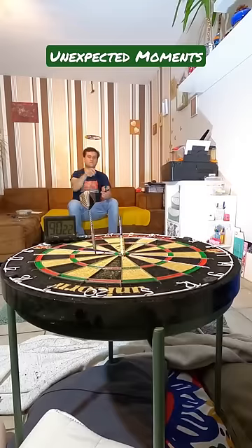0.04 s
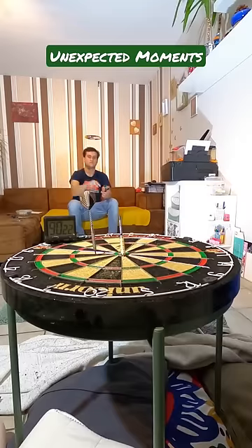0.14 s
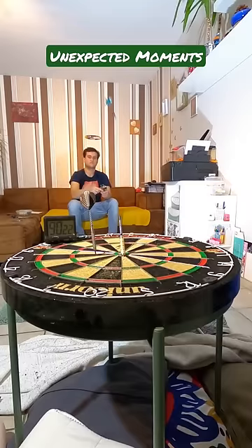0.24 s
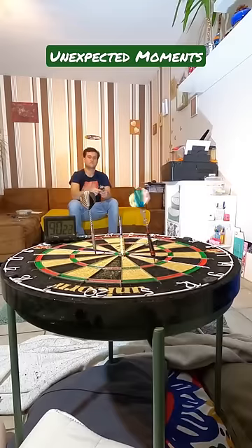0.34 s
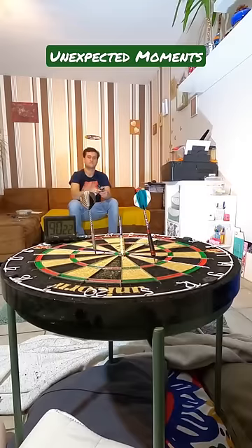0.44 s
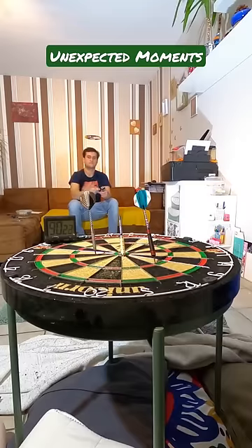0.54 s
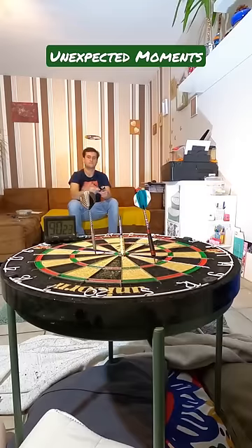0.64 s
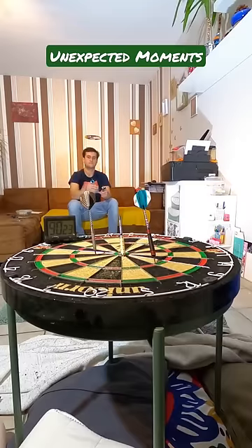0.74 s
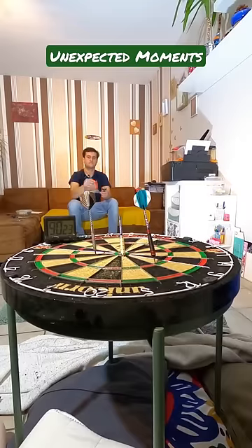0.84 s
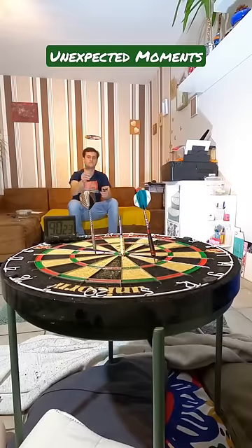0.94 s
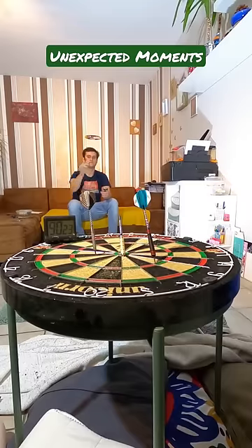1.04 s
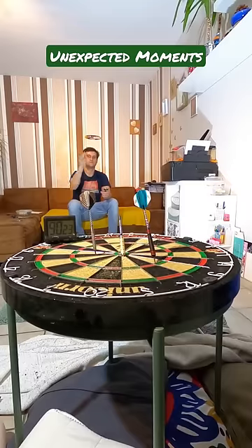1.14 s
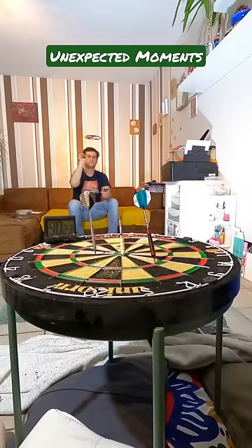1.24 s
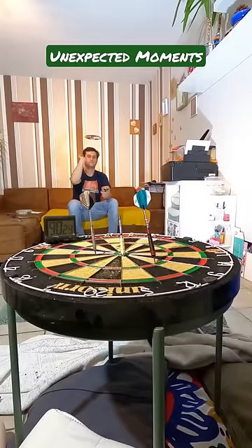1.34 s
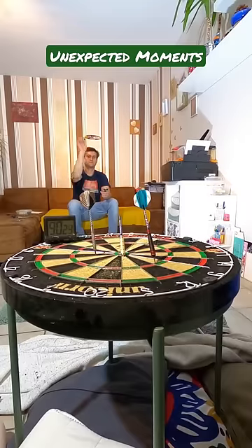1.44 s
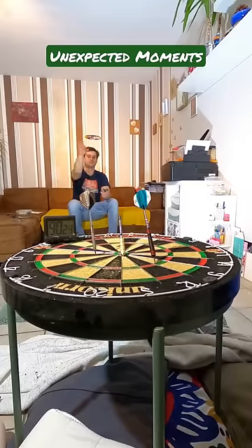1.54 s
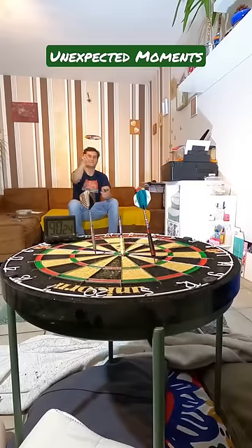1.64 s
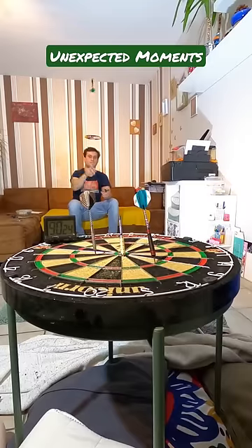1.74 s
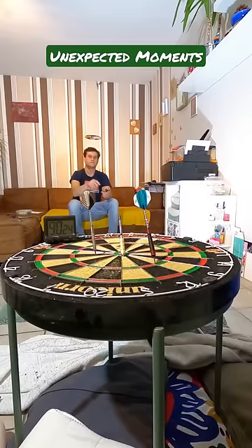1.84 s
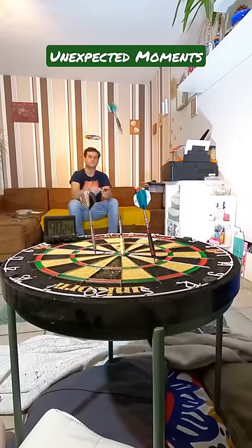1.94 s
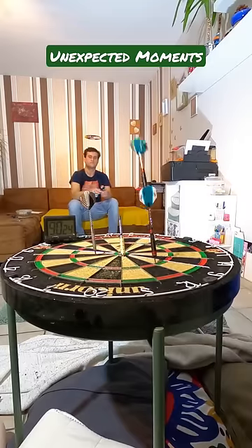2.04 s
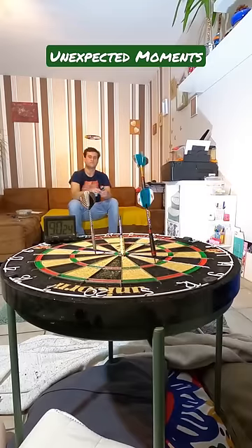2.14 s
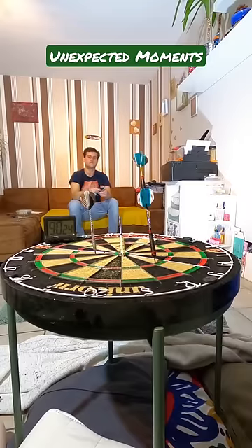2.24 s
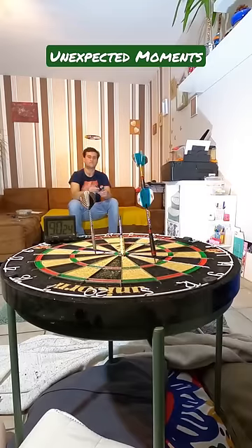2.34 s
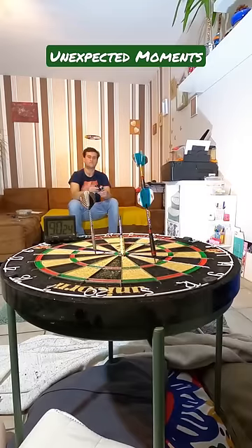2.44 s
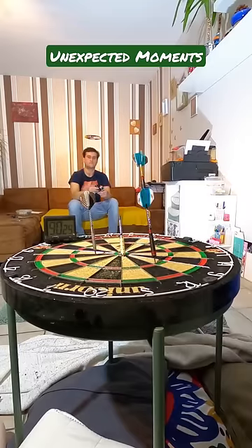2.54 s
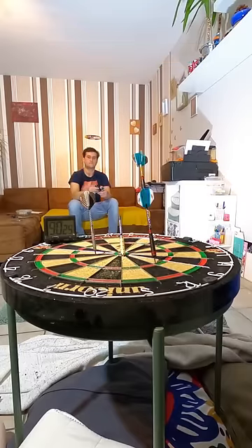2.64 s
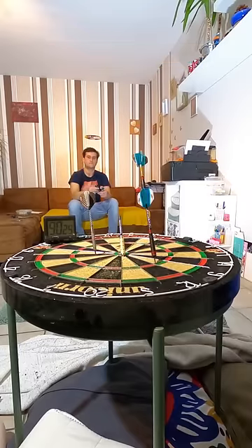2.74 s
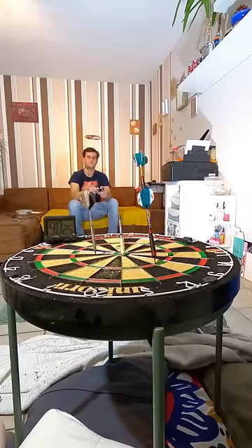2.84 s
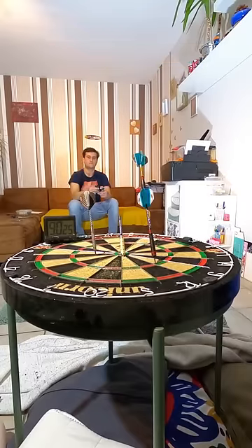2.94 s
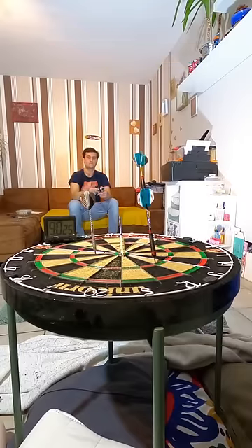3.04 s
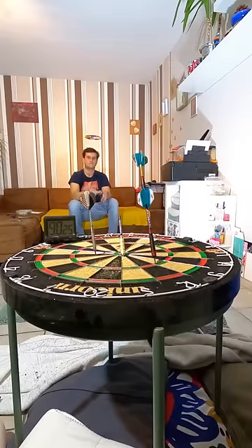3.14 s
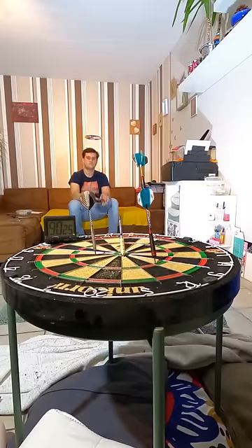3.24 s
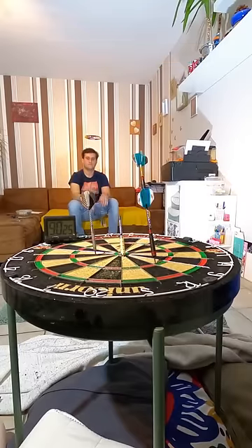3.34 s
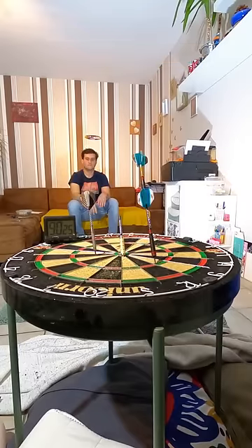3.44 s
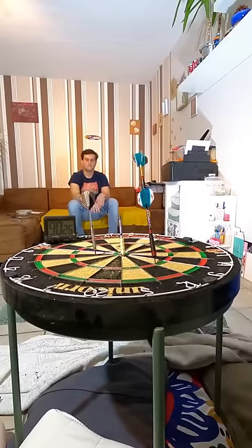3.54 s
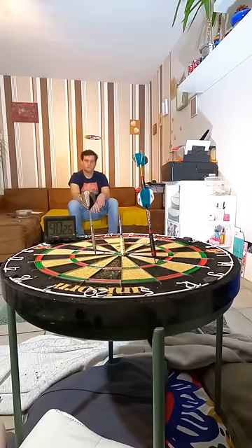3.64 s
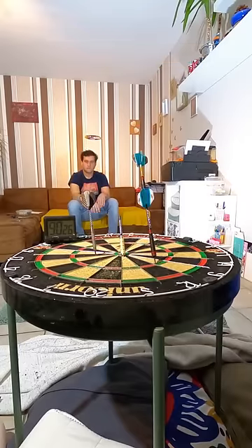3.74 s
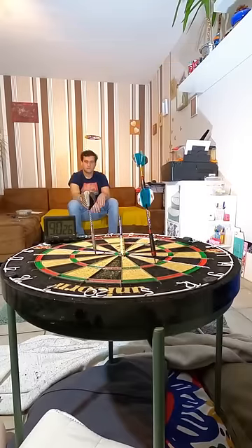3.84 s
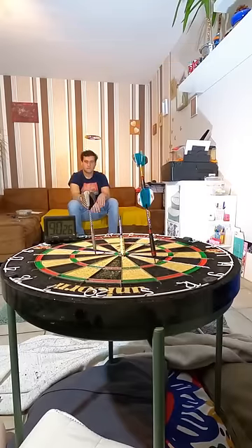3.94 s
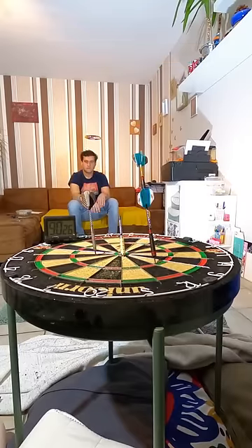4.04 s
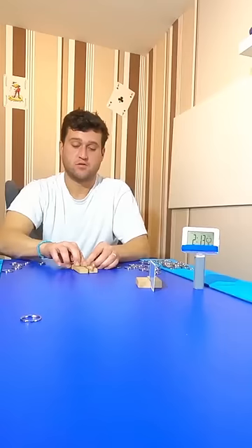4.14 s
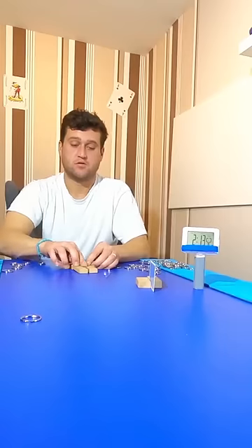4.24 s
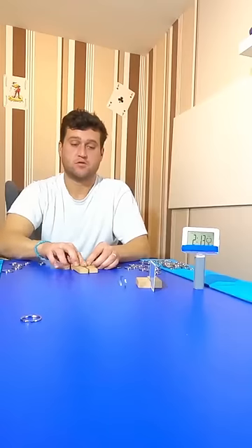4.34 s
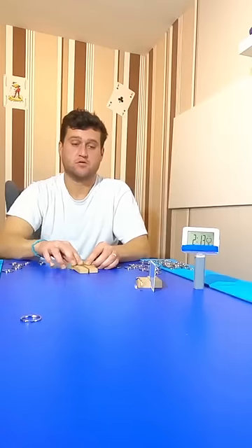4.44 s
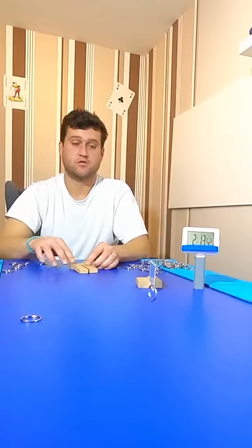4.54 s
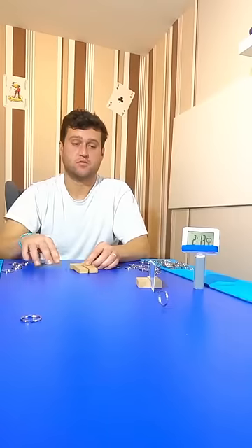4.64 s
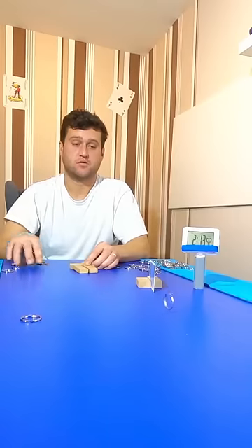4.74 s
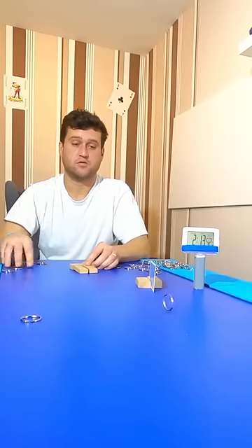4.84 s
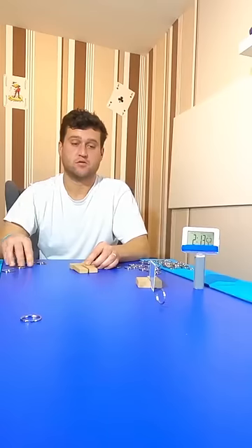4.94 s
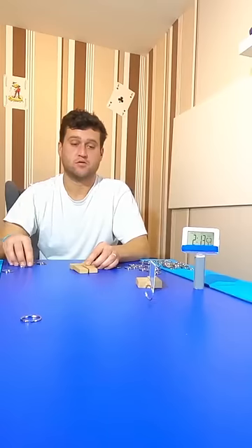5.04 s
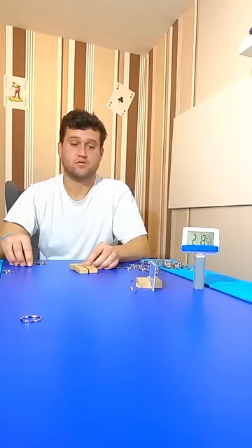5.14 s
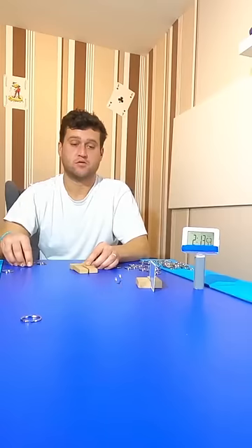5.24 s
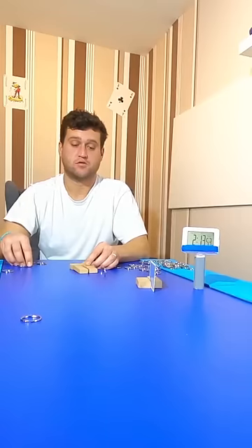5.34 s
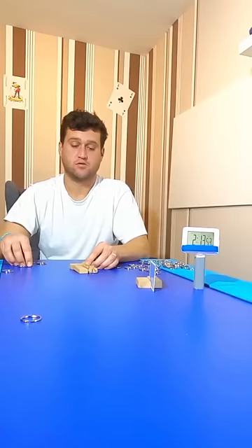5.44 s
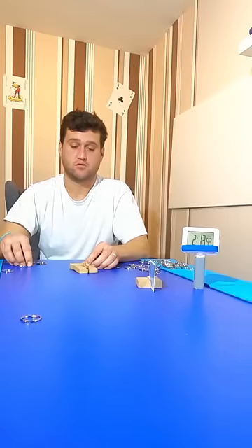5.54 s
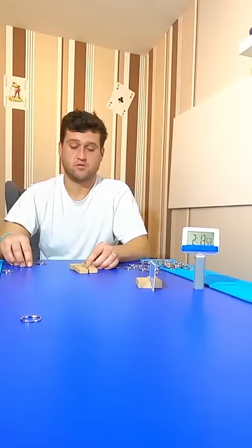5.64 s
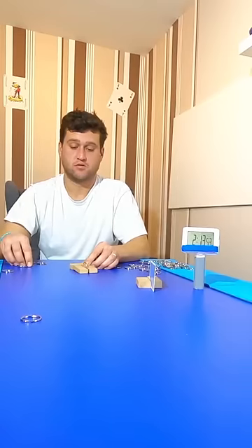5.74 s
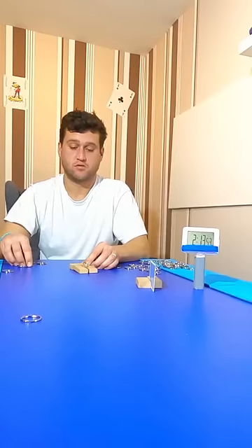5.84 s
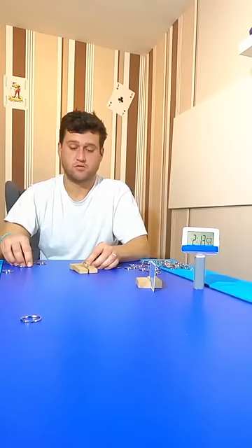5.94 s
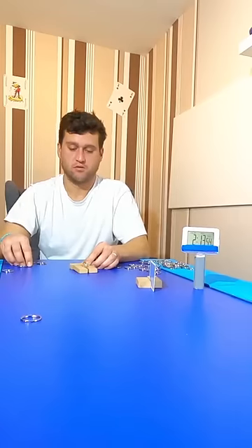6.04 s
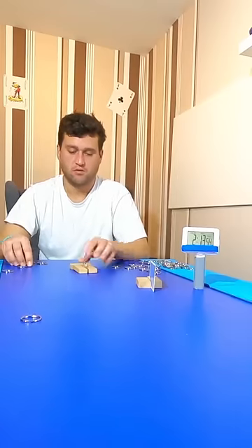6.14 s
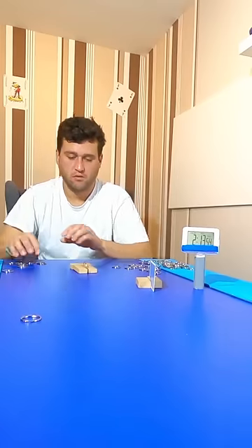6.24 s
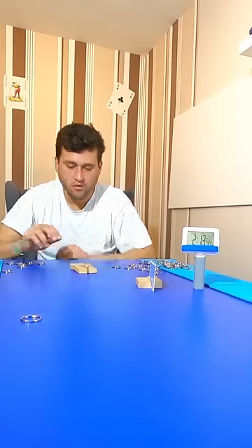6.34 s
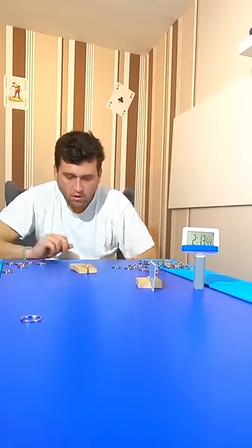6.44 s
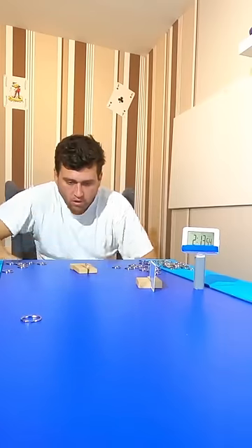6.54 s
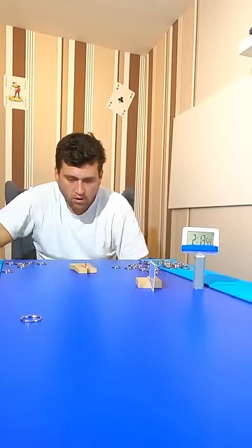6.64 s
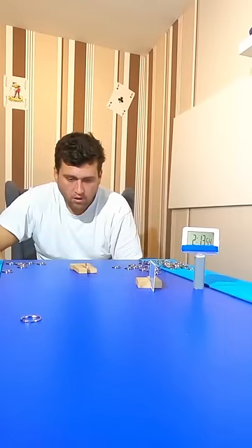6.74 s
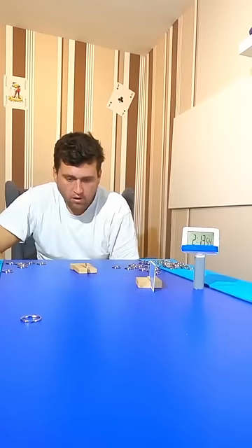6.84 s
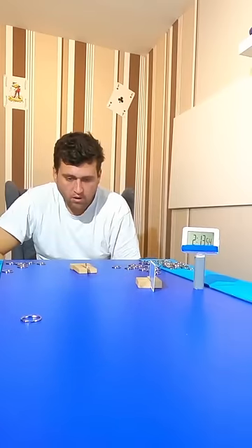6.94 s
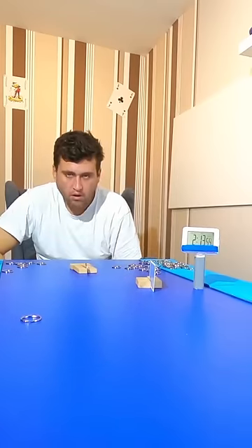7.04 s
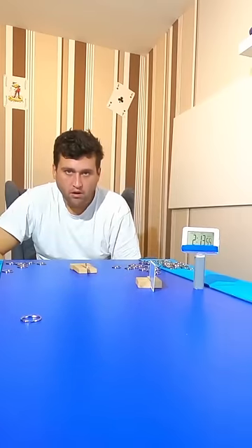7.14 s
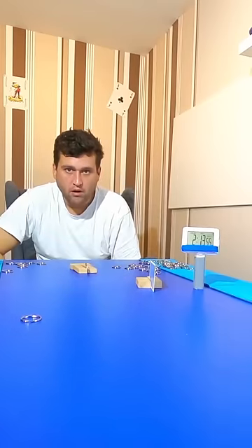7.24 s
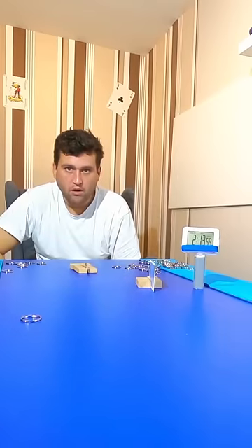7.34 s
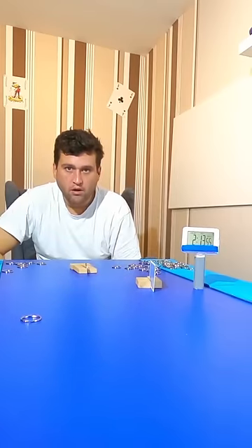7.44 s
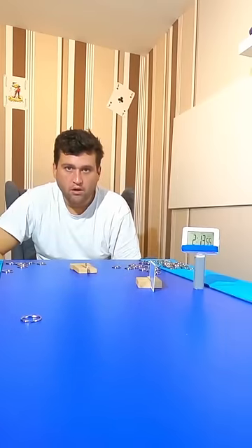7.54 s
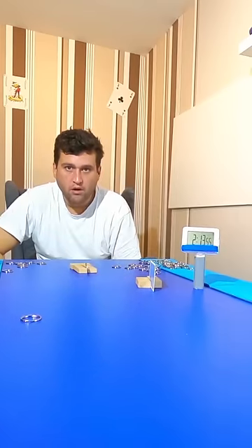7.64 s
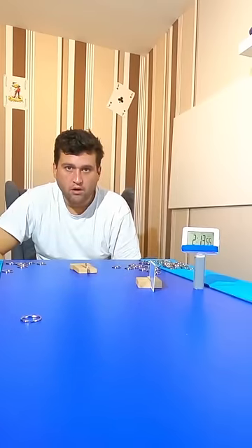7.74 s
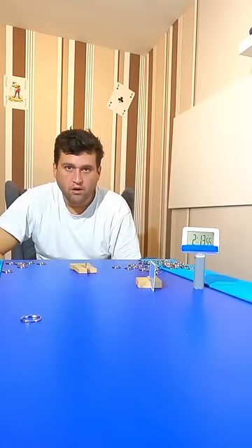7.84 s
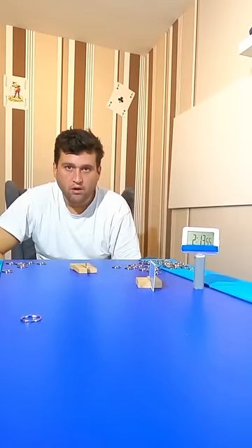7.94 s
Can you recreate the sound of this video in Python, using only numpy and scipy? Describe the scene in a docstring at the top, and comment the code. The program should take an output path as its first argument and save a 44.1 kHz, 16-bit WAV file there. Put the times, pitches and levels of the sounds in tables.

```python
"""Furnished room, close microphone: two darts drop into a fibre dartboard lying on a light metal stand.
Jolts ring barrel and fibre, slow modes carry the board, stand and floor; hands slap on knees as grain bursts.
After a short silent gap, at a table: a small metal ring is flicked off a wooden block and hops rattling over
the top, as knocks with ringing modes. A hand sweeps loose rings aside in bursts of grains; an arm and perhaps
a knee bump the table, and the floor booms at its lowest mode. Room tone and room tails lie around it all."""
import sys
import numpy as np
from scipy import signal
from scipy.fft import rfft, irfft, next_fast_len
from scipy.io import wavfile

SR = 44100
rng = np.random.default_rng(int(sys.argv[2]) if len(sys.argv) > 2 else 0)


def nominal_scale(level):
    """Amplitude ratio for a level in decibels (scalar or array-like)."""
    x = np.asarray(level, float) / 20
    return 10 ** x


def output_pcm(signal):
    """Save a mono or channel-first signal as 16-bit PCM at the path in sys.argv[1].

    Samples are clipped to [-1, 1] before scaling.
    """
    pcm = np.clip(np.atleast_2d(signal).T, -1, 1) * 32767
    wavfile.write(sys.argv[1], SR, np.round(pcm).astype(np.int16))


N = 353241

# Room tone at the board, then at the table: shape of the spectrum [f/Hz, level/dB]
AIR_AT_BOARD = [(12, -32), (20, -0.5), (46, -7), (120, -22), (204, -9.5), (285, -22), (328, -20),
                (718, -31.5), (1220, -30.5), (1810, -34.5), (2260, -37.5), (6400, -47.5), (7500, -41.5),
                (8400, -51), (16000, -66)]
AIR_AT_TABLE = [(12, -42), (20, -5.5), (44, -13.5), (107, -22.5), (127, -11), (154, -1.5), (248, -8.5),
                (310, -8), (357, -16), (1330, -25.5), (4300, -42), (8410, -41), (16000, -50.5)]
# Room decay before each place's liveness scales it [f/Hz, t60/s]
ROOM_DECAY = [(60, 0.68), (250, .45), (1000, .38), (3000, 0.28), (6000, 0.36), (12000, 0.23)]
# Faint double ticks: first tick of each pair [t/s, level/dB]
TICK_PAIRS = [(0.2244, -74), (1.4744, -66.5), (2.7614, -69)]
# Modes of a tick [f/Hz, level/dB, t60/s]
TICK_MODES = [(6840, 4, 0.0092), (7860, 7, .008), (9000, -1, .005)]
# Faint rustles of flights and cloth [t/s, level/dB, t60/s, rise/s]
RUSTLE_EVENTS = [(0.52, -66, 1.3, .07), (0.8, -53, 0.28, .025), (1.66, -64.5, 0.88, .1),
                 (2.1, -54, 1.1, 0.18), (2.5, -52.5, 0.34, 0.037), (3.28, -67.5, 0.41, .02),
                 (3.352, -46, 0.23, 0.0094)]
# Spectrum of the rustles [f/Hz, level/dB]
RUSTLE_COLOUR = [(470, -56), (800, -20.5), (1920, -6), (2210, -13.5), (3450, -13.5), (4330, -1.5),
                 (5440, -3), (6130, -12.5), (7330, -0.5), (7970, -17.5), (9890, -21.5), (14000, -42)]
# Darts entering the board [t/s, jolt level/dB, extra ring f/Hz, rebound after/s, weight level/dB]
DART_HITS = [(0.6008, -17, 5200, .0112, 4), (2.246, -14, 6500, .0158, 3.5)]
# Barrel and wire modes of a jolt [f/Hz, level/dB, t60/s]
BARREL_MODES = [(3120, -5, 0.0044), (4360, -1, 0.007), (4900, -2.5, .005), (5420, 2.5, 0.004),
                (6350, -2, 0.008), (7150, -2.5, 0.0065), (8540, -7, 0.0065), (9600, -19.5, 0.0049),
                (11000, -25, 0.004), (13000, -31.5, .003)]
# Packed fibre modes of a jolt [f/Hz, level/dB, t60/s]
FIBRE_MODES = [(990, -19.5, .008), (1530, 0.64, 0.012), (1920, -8, 0.008), (2570, -7, 0.014)]
# Spectrum of fibres parting round the point [f/Hz, level/dB]
CRUNCH_COLOUR = [(200, -16.5), (550, 1.5), (900, 1), (2300, -1.5), (3500, -5), (7000, -10), (10000, -18),
                 (15000, -25)]
# Modes of board, stand and floor [f/Hz, level/dB, t60/s, swell/s]
BOARD_MODES = [(30.2, -35.5, 1.3, .05), (38, -31.5, 0.85, 0.035), (62.4, -40.5, 0.5, .04),
               (75.6, -19, 0.23, 0.032), (112, -40.5, .7, .02), (134, -34, 0.42, 0.014),
               (171.5, -43, .6, 0.046), (214, -35, .2, 0.0054), (274, -24.5, 0.14, 0.0019),
               (327.5, -35, 0.22, 0.0046), (413, -38.5, 0.21, .005), (498, -30.5, 0.092, 0.0077),
               (637, -39.5, 0.15, .003), (825, -39.5, 0.022, 0.0026)]
# Spectrum of hands on knees [f/Hz, level/dB]
SLAP_SPECTRUM = [(24, -27.5), (40, -14), (65, 0), (140, -7.5), (250, 1.5), (421, -10.5), (638, -9),
                 (1970, -14), (3300, -21), (5250, -19), (14000, -52)]
# Loose rings stirred [t/s, level/dB, t60/s]
RING_STIRS = [(4.171, -55.5, 0.32), (4.357, -57, 0.74), (6.36, -75, 1.1)]
# Spectrum of jostling rings, also used for the finger's drag [f/Hz, level/dB]
SWEEP_COLOUR = [(290, -55.5), (500, -18.5), (770, -22), (1290, -7), (2740, -5), (3420, -13), (6590, -22),
                (14000, -51.5)]
# Wooden block modes [f/Hz, level/dB, t60/s]
BLOCK_MODES = [(650.5, -13.5, .015), (940, -9.5, 0.013), (1180, -2.5, 0.0089), (1590, -4, .007),
               (1990, -1, 0.018), (2500, 1.5, .006), (3100, -5.5, 0.0069), (3770, -19, .004),
               (4800, -24, 0.0036), (6500, -29, .003), (8464, -33.5, 0.002994)]
# Spectrum of the block skidding on the top [f/Hz, level/dB]
SKID_COLOUR = [(150, -19), (350, 4), (1200, 1), (3500, -5.5), (5000, -18), (9000, -34.5), (13000, -56)]
# Table frame modes [f/Hz, level/dB, t60/s]
FRAME_MODES = [(40, -39, 0.4), (131.5, -28.5, 0.22), (190, -33, 0.14), (259, -21, .14), (311, -21.5, 0.15),
               (403, -28, 0.11), (486, -22.5, .1)]
# Ring touching the table [t/s, knock level/dB, knock f/Hz, rattle level/dB before the mix]
RING_LANDINGS = [(4.518, 2.5, 2540, -12), (4.6177, -0.5, 2680, -17.5), (4.6233, -9, 2900, -24),
                 (4.6804, -0.5, 2774, -11), (4.786, -0.5, 2660, -16), (4.802, -2, 2320, -26),
                 (4.8802, -10.5, 3300, -22.5), (4.9005, -4, 2690, -18.5), (4.9743, -14.5, 3100, -15),
                 (5.0661, -2.5, 2300, -18), (5.0836, -5, 1920, -18.5), (5.151, -4, 2300, -22.5),
                 (5.166, -4, 2770, -20.5), (5.2144, -7, 1640, -13.5), (5.2754, -8, 3460, -14),
                 (5.3487, -13, 2980, -19.5), (5.3909, -3, 2820, -18), (5.453, -4, 2570, -14),
                 (5.5339, -2.5, 2550, -13.5), (5.6214, 1.5, 2830, -14), (5.6929, -2, 2720, -16.5),
                 (5.7195, -3.5, 2920, -23.5), (5.7375, -17, 2500, -28.5), (5.7594, -34, 1430, -21.5),
                 (5.8256, -19, 2670, -26.5), (5.8461, -14.5, 2880, -32), (5.8665, -20, 2800, -41),
                 (5.8835, -22, 2500, -45), (5.8879, -8, 2500, -25), (5.9072, -18, 2440, -35),
                 (5.9162, -20, 2500, -35)]
# Table top modes [f/Hz, level/dB, t60/s]
TABLE_TOP_MODES = [(1179, -17, 0.0097), (1740, -6.5, 0.0086), (2300, 1, 0.0047), (2866, -7.5, 0.0096),
                   (3510, -4.5, 0.0073), (4248, -6, 0.0089), (5400, -9, 0.006), (6660, -15, 0.0048),
                   (8040, -21.5, 0.0083), (10100, -29.5, 0.0043), (11550, -43.5, 0.0027),
                   (14100, -40.5, .004)]
# Metal ring modes [f/Hz, level/dB, t60/s]
METAL_RING_MODES = [(9350, -4, 0.03), (11740, -7.5, 0.04), (12100, -11, .15), (12030, -9.5, 0.12),
                    (13500, -15.5, .03)]
# Spectrum of grit under a landing or a sleeve [f/Hz, level/dB]
GRIT_COLOUR = [(300, -27.5), (700, -14.5), (1300, 0), (3000, 2), (6000, -6.5), (10000, -21.5), (13000, -32),
               (15500, -48)]
# Spectrum of the top drumming on under a landing [f/Hz, level/dB]
DRUMMING_COLOUR = [(110, -22), (200, -0.5), (330, 0.5), (520, -7.5), (750, -32)]
# Spectrum of the tipped ring grinding round its rim [f/Hz, level/dB]
WOBBLE_COLOUR = [(200, -22), (500, -3.5), (800, -6), (1400, 4), (2500, -18), (5000, -33), (12000, -55)]
# A knee pushes the table [t/s, floor mode level/dB, table frame level/dB]
KNEE_PUSHES = [(6.575, -32, -46.5), (6.65, -21.5, -47), (6.77, -30, -51), (6.88, -28.5, -46.5),
               (7.09, -39.5, -64.5)]
# Arm on the table, at the elbow [t/s, level/dB]
ARM_BUMPS = [(6.727, -45.5), (6.889, -46)]
# Spectrum of the elbow's soft first contact [f/Hz, level/dB]
ELBOW_COLOUR = [(150, -3), (490, 0), (1100, -7), (2000, -24), (5000, -55)]
# Spectrum of the wrist's brighter tap [f/Hz, level/dB]
WRIST_COLOUR = [(88, -26), (150, 1.5), (496, -3), (753, -13), (1020, -2), (1280, -0.5), (1800, -10.5),
                (5220, -22), (14000, -43.5)]
# A sleeve drags over the top (one row) [t/s, level/dB, t60/s, rise/s]
SLEEVE_DRAG = (6.87, -63, 1.1, .08)
# Side signal, stronger towards the treble [f/Hz, side over mid level/dB]
SIDE_OVER_MID = [(100, -43), (500, -31), (1000, -28), (3000, -30.5), (5000, -21.5), (9000, -15),
                 (13000, -4)]
# Treble cut of the recorder [f/Hz, level/dB]
RECORDER_TOP = [(14000, 0), (15400, -3.5), (16200, -25)]

GAP_START_S, GAP_END_S = 4.166, 4.173   # silent gap between the two set-ups


def rms_one(x):
    """Scale to rms 1."""
    return x / np.sqrt(np.mean(x ** 2) + 1e-20)


def coloured(x, points, share=1):
    """Weigh a signal by a smooth (f/Hz, level/dB) curve, or by a share of its dB."""
    size = next_fast_len(N + 4096)
    hz = np.maximum(np.arange(size // 2 + 1) * SR / size, 1)
    at, db = np.transpose(points)
    gain = nominal_scale(share * np.interp(np.log(hz), np.log(at), db))
    return irfft(rfft(x, size) * gain, size)[:N]


def grains(colour, per_s, spread_db):
    """Dense uneven clicks given a colour; rms 1."""
    sizes = nominal_scale(spread_db * np.minimum(rng.exponential(1, N), 5)) * rng.standard_normal(N)
    clicks = sizes * (rng.random(N) < per_s / SR)
    return rms_one(coloured(clicks, colour))


def swells(times, levels_db, t60s, rises):
    """Gain that rises and dies away once for each event; the events add in power."""
    power = np.zeros(N)
    for s, db, t60, rise in np.broadcast(np.atleast_1d(times), levels_db, t60s, rises):
        t = np.maximum(np.arange(N) / SR - s, 0)
        power += (nominal_scale(db - 60 * t / t60) * (1 - np.exp(-t / rise))) ** 2
    return np.sqrt(power)


def strike(times, db, modes, spread_db, detune, contact_s):
    """Each blow rings all modes with its own strengths and pitch shifts; rings build up over the contact."""
    hz, mode_db, t60 = np.transpose(modes)[:, :, None]
    t = np.arange(round(t60.max() * SR)) / SR
    out = np.zeros(N + len(t))
    chance = rng.standard_normal((len(times), 2, len(modes), 1))
    sign = (-1.) ** np.arange(len(modes))[:, None]   # neighbouring modes start in opposite phase
    build_up = (1 - np.exp(-t / contact_s)) ** 2
    for s, blow_db, (strength, shift) in zip(times, db, chance):
        level = nominal_scale(blow_db + mode_db + spread_db * strength - 60 * t / t60)
        rings = sign * level * np.sin(2 * np.pi * hz * (1 + detune * shift) * t)
        at = round(s * SR)
        out[at:at + len(t)] += rings.sum(axis=0) * build_up
    return out[:N]


def knocks(times, db, pitches_hz, t60, contact_s):
    """One short ring per blow at a pitch of its own."""
    return sum(strike([s], [d], [(hz, 0, t60)], 0, 0, contact_s) for s, d, hz in zip(times, db, pitches_hz))


def room(x, liveness, onset_s=0.0029):
    """Octave bands of noise that swell in after the first walls and die each at its own rate."""
    t, tail = np.arange(SR) / SR, 0
    at, t60 = np.transpose(ROOM_DECAY)
    for low in 30 * 2. ** np.arange(9):
        octave = signal.butter(2, [low, 2 * low], "band", fs=SR, output="sos")
        band = signal.sosfilt(octave, rng.standard_normal(SR))
        band_t60 = liveness * np.interp(np.log(low * np.sqrt(2)), np.log(at), t60)
        tail = tail + band * nominal_scale(-60 * t / band_t60)
    tail = tail * (1 - np.exp(-(t / onset_s) ** 2))
    return signal.fftconvolve(x, tail / np.sqrt(np.sum(tail ** 2)))[:N]


def air():
    """Room tone of the two set-ups: steady noise with the spectrum of each place."""
    first = nominal_scale(-64) * rms_one(coloured(rng.standard_normal(N), AIR_AT_BOARD))
    second = nominal_scale(-66.5) * rms_one(coloured(rng.standard_normal(N), AIR_AT_TABLE))
    return np.where(np.arange(N) / SR < GAP_START_S, first, second)


def double_ticks():
    """Faint ticks that each come twice, ringing a few short high modes."""
    gap_s, loss_db = .019, 1
    s, db = np.transpose(TICK_PAIRS)
    times, levels_db = np.append(s, s + gap_s), np.append(db, db - loss_db)
    return strike(times, levels_db, TICK_MODES, spread_db=2.0, detune=0.013, contact_s=0.00018)


def rustles():
    """Flights and cloth rub in uneven grains that swell and fade."""
    return grains(RUSTLE_COLOUR, 6000, spread_db=3.0) * swells(*np.transpose(RUSTLE_EVENTS))


def dart_cracks():
    """The point tears in by four jolts that ring barrel and, duller, fibre; then the shaft whips back."""
    jolt_gap_s, jolt_spread_db, rebound_db = .0016, 3.5, -9
    fibre_db, ring_db, crunch_db = -2, 1, -6.5   # beside the jolts
    start, peak_db, ring_hz, rebound, _ = np.transpose(DART_HITS)[:, :, None]
    chance = rng.standard_normal((len(DART_HITS), 5, 3))
    lag = np.arange(5) * jolt_gap_s * (1 + .13 * chance[..., 0])
    lag[:, -1:] = rebound
    s = (start + lag).ravel()
    hz = (ring_hz * (1 + .09 * chance[..., 1])).ravel()
    db = (peak_db + jolt_spread_db * chance[..., 2] + rebound_db * (np.arange(5) == 4)).ravel()
    barrel = strike(s, db, BARREL_MODES, 2.9, 0.052, contact_s=0.00015)
    fibre = strike(s, db + fibre_db, FIBRE_MODES, 2, 0.041, contact_s=0.00046)
    # fibres part round the point
    parting = swells(start.ravel(), peak_db.ravel() + crunch_db, .04, .002)
    crunch = grains(CRUNCH_COLOUR, 9000, spread_db=2.0) * parting
    return barrel + fibre + crunch + knocks(s, db + ring_db, hz, t60=0.0069, contact_s=0.00023)


def board():
    """Modes of board, stand and floor; the lowest are driven through the legs and swell in late."""
    weight_lag_s = .002   # the board takes the weight
    waver_per_s, waver_rad, waver_db, steady_below_hz = 14, 2.4, 2.5, 90
    out = np.zeros(N)
    t = np.arange(2 * SR) / SR
    for s, *_, db in DART_HITS:
        at = round((s + weight_lag_s) * SR)
        steps = rng.standard_normal((len(BOARD_MODES), 2, 80))
        for (hz, mode_db, t60, swell), walks in zip(BOARD_MODES, steps):
            # the upper modes waver more and more as they die
            loose = (hz > steady_below_hz) * (1 - np.exp(-(t / .08) ** 2))
            turn, gain = (loose * np.interp(t * waver_per_s, np.arange(80), v) for v in walks)
            level = nominal_scale(db + mode_db - 60 * t / t60 + waver_db * gain) * (1 - np.exp(-(t / swell) ** 2))
            out[at:at + len(t)] += level * np.sin(2 * np.pi * hz * t + waver_rad * turn)
    return out


def slaps():
    """Palms land on the knees in a burst of grains, then three finger pats follow one after another."""
    slap_s, slap_db, rise_s, t60_s = 3.658, -21.5, 0.014, 0.34
    finger_gap_s, finger_db, finger_loss_db, finger_t60_s = 0.018, -22.5, 5, .16
    k = np.arange(3)
    palms = swells(slap_s, slap_db, t60_s, rise_s)
    fingers = swells(slap_s + finger_gap_s * (k + 1), finger_db - finger_loss_db * k, finger_t60_s, rise_s / 2)
    return grains(SLAP_SPECTRUM, 12000, spread_db=1.5) * np.hypot(palms, fingers)


def sweep():
    """Rings jostle in dense grains; the heap slides in five slips, each a burst that dies fast."""
    sweep_s, sweep_db, slip_gap_s, slip_loss_db = 6.454, -38.5, 0.0285, 0.05
    slip_rise_s, slip_t60_s, settle_t60_s = 0.0018, 0.16, 0.22   # the last slip settles slowly
    scuff_s, scuff_db = 0.023, -10.5   # the hand scuffs up to the heap just before
    k = np.arange(5)
    t60 = np.where(k < 4, slip_t60_s, settle_t60_s)
    slips = swells(sweep_s + slip_gap_s * k, sweep_db - slip_loss_db * k, t60, slip_rise_s)
    slips += swells(sweep_s - scuff_s, sweep_db + scuff_db, settle_t60_s, scuff_s)
    stirs = swells(*np.transpose(RING_STIRS), 0.0078)
    return grains(SWEEP_COLOUR, 2500, spread_db=2.0) * np.hypot(slips, stirs)


def finger_flick():
    """A drag, the blow and its chatter ring the block; the blow goes on into the table frame."""
    flick_s, flick_db, thud_s = 4.4229, -7, 4.4255
    chatter_s, chatter_loss_db = 0.001804, 5   # the block chatters twice
    drag_s, drag_db = 0.01, -31   # the finger drags over the block before it lets go
    k = np.arange(3)
    t = np.arange(N) / SR - flick_s
    drag_gain = nominal_scale(drag_db) * np.clip(1 + t / drag_s, 0, 1) ** 2 * (t < 0)
    drag = grains(SWEEP_COLOUR, 8300, spread_db=3.5) * drag_gain
    # the block skids a little on the top
    skid = grains(SKID_COLOUR, 5000, spread_db=2.5) * swells(flick_s, -29, 0.31, 0.004)
    block = strike(flick_s + chatter_s * k, flick_db - chatter_loss_db * k, BLOCK_MODES,
                   spread_db=1.5, detune=0.0604, contact_s=0.00029)
    frame = strike([thud_s], [0], FRAME_MODES, spread_db=0.5, detune=0, contact_s=.0015)
    return drag + skid + block + frame


def ring_roll():
    """Small touches between the hops ring the top and crowd towards the end, as the ring wobbles down."""
    start_s, end_s, per_s, roll_db = 4.55, 5.92, 95, -46
    crowding = 0.78   # below 1 the touches crowd towards the end
    touches = rng.random((round(per_s * (end_s - start_s)), 2))
    at = start_s + (end_s - start_s) * touches[:, 0] ** crowding
    at_db = roll_db + 10 * (touches[:, 1] - .5)
    roll = strike(at, at_db, TABLE_TOP_MODES, 4.3, 0.095, contact_s=0.00049)
    # the ring tips over and grinds round its rim
    wobble = swells(5.74, -42, 0.5, 0.018) * (np.arange(N) / SR < end_s)
    return roll + grains(WOBBLE_COLOUR, 1200, spread_db=3.0) * wobble


def ring_hops():
    """Each hop: a short knock pitched by how the ring lands, and the rattle of table top and metal."""
    chime_db, chime_per_rattle = -32, 0.98   # more chime when a landing rattles more than it knocks
    grit_db, drumming_db = -17.5, -33   # beside the rattle
    second_lag_s, second_db = (.002, .004), -8.5   # the far side lands just after the near side
    s, db, hz, rattle_db = np.transpose(RING_LANDINGS)
    metal_db = chime_db + rattle_db + chime_per_rattle * (rattle_db - db)
    rattle = strike(s, metal_db, METAL_RING_MODES, 3.5, 0.008, contact_s=0.0029)
    rattle += strike(s, rattle_db, TABLE_TOP_MODES, 4.02, 0.087, contact_s=0.00038)
    rattle += grains(GRIT_COLOUR, 9000, spread_db=1.0) * swells(s, rattle_db + grit_db, 0.041, 0.0013)
    rattle += grains(DRUMMING_COLOUR, 3000, spread_db=1.5) * swells(s, rattle_db + drumming_db, .25, .005)
    rattle += ring_roll()
    lag, soft, shift = rng.random((len(s), 3)).T
    again = s + np.interp(lag, [0, 1], second_lag_s)
    rattle += strike(again, rattle_db + second_db, TABLE_TOP_MODES, 3.7, 0.09, contact_s=0.00038)
    knock = knocks(s, db, hz, t60=0.0076, contact_s=0.00067)
    again_db = db + second_db - 5.0 * (soft - .5)
    knock += knocks(again, again_db, hz * (1 + 0.34 * (shift - .5)), t60=0.0075, contact_s=0.00055)
    return knock, rattle


def boom():
    """A knee's pushes swing the floor at its lowest mode, with a little rumble above."""
    floor_hz, rise_s, floor_t60_s, frame_t60_s = 37.33, 0.021, 0.61, 0.67
    s, floor_db, frame_db = np.transpose(KNEE_PUSHES)
    swing = np.sin(2 * np.pi * floor_hz * (np.arange(N) / SR - s[0]))
    low_band = signal.butter(2, [60, 170], "band", fs=SR, output="sos")
    rumble = rms_one(signal.sosfilt(low_band, rng.standard_normal(N)))
    floor = swells(s, floor_db, floor_t60_s, rise_s) * swing
    return floor + swells(s, frame_db, frame_t60_s, rise_s) * rumble


def arm_bumps():
    """The elbow lands softly, the wrist follows with a brighter tap; the sleeve drags over the top."""
    wrist_lag_s, wrist_db, rise_s, t60_s = 0.013, 0.5, 0.0036, .27
    s, db = np.transpose(ARM_BUMPS)
    elbow = grains(ELBOW_COLOUR, 3500, spread_db=1.0) * swells(s, db, t60_s, 2 * rise_s)
    sleeve = grains(GRIT_COLOUR, 9000, spread_db=1.0) * swells(*SLEEVE_DRAG)
    wrist_gain = swells(s + wrist_lag_s, db + wrist_db, t60_s, rise_s)
    return elbow + sleeve + grains(WRIST_COLOUR, 3000, spread_db=2.0) * wrist_gain


def stereo(mid):
    """A nearly mono image: a little filtered noise-like side signal, stronger towards the treble,
    and the left with less top treble than the right."""
    lean_from_hz, lean_db = 8500, -7   # left over right, half of it on each channel
    noise_filter = rng.standard_normal(256) / 16
    side = coloured(signal.fftconvolve(mid, noise_filter)[:N], SIDE_OVER_MID)
    lean = [(lean_from_hz, 0), (1.6 * lean_from_hz, lean_db)]
    return np.array([coloured(mid, lean, share=.5) + side, coloured(mid, lean, share=-.5) - side])


def scene():
    """Near sources with some room around them, in two set-ups parted by a silent gap."""
    ticks, rustle, cracks, lows, slap = double_ticks(), rustles(), dart_cracks(), board(), slaps()
    swept, flick, (knock, rattle), bumps = sweep(), finger_flick(), ring_hops(), arm_bumps()
    # what each source sends into the room
    to_board_room = nominal_scale(-6.5) * cracks + nominal_scale(-8.5) * lows + nominal_scale(-12.5) * slap + nominal_scale(-5.5) * rustle
    to_table_room = nominal_scale(-11.5) * knock + nominal_scale(-1.76) * rattle + nominal_scale(-5.5) * flick
    to_table_room += nominal_scale(-6.0) * swept + nominal_scale(-7.5) * bumps
    mid = room(to_board_room, liveness=1.2) + room(to_table_room, liveness=1.0, onset_s=.006)
    mid += air() + ticks + rustle + cracks + lows + slap
    mid += swept + flick + knock + nominal_scale(2.06) * rattle + boom() + bumps
    t = np.arange(N) / SR
    return stereo(mid * ((t < GAP_START_S) | (t > GAP_END_S)))


def low_pass(x):
    """Removes everything above the highest recorded frequency."""
    return signal.sosfilt(signal.butter(12, 16370, fs=SR, output="sos"), x)


def record(dry):
    """The recorder cuts the top treble of both channels."""
    mix = np.array([coloured(x, RECORDER_TOP) for x in dry])
    return low_pass(mix)


dry = scene()
out = record(dry)
output_pcm(out)
```